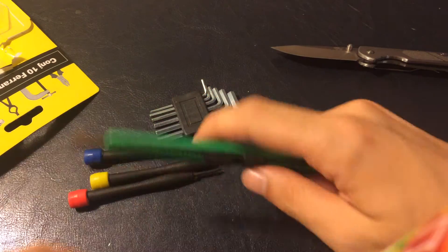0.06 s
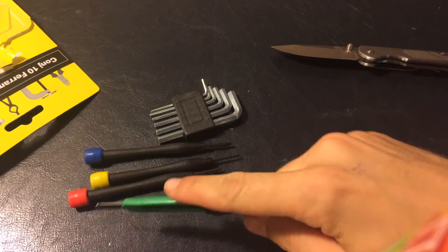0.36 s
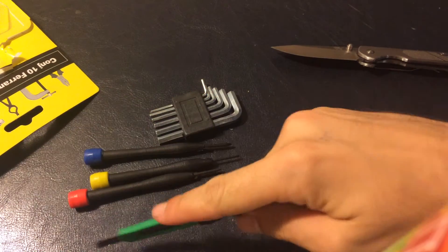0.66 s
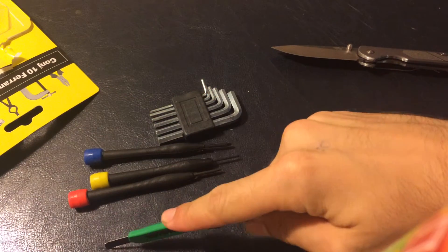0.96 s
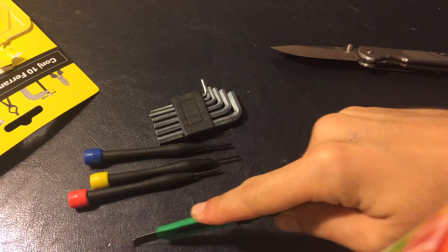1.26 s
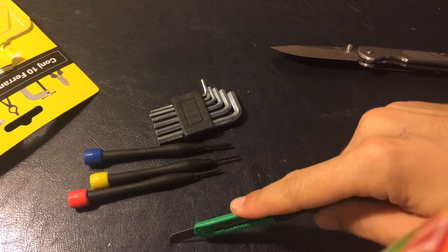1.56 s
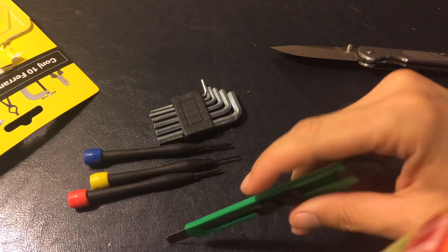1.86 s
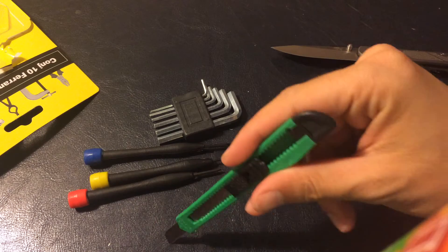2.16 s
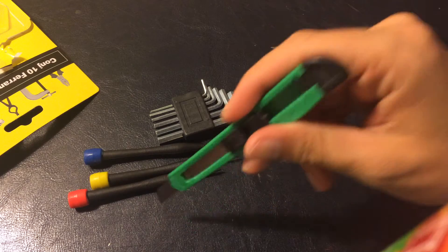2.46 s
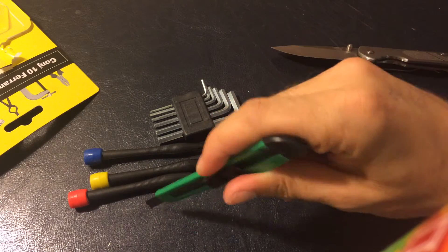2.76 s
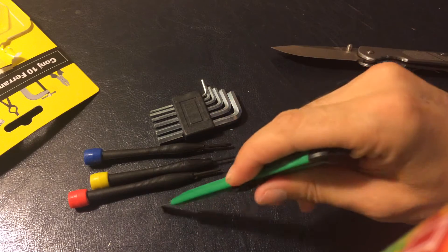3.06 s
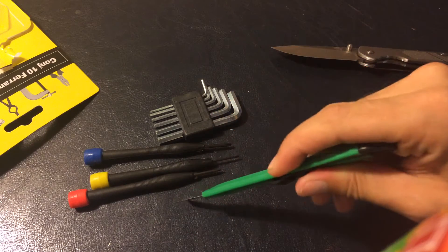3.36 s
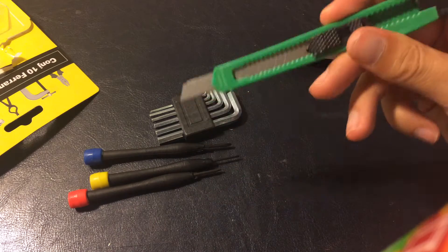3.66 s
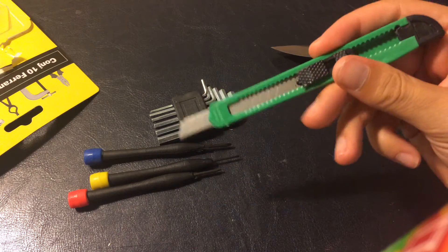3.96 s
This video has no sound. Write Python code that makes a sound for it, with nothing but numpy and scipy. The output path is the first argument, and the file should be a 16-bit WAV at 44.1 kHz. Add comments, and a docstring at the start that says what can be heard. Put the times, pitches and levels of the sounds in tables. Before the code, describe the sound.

A plastic utility knife clicks and rattles in the hand, then its blade scrapes lightly along a table. More clicks follow, the tip snaps hard against the surface and scrapes again, ending with a click, close up in a quiet room.

```python
"""A plastic utility knife clicks as its slider and loose blade knock inside the handle.
Its tip is dragged twice across a table, scraping in many tiny slips, and once snaps hard against it.
The hand holding the knife rustles, rubs and bumps softly.
The small, quiet room adds a short echo, with a faint hum and hiss underneath."""
import sys
import numpy as np
from scipy import signal
from scipy.fft import rfft, irfft
from scipy.io import wavfile
from scipy.ndimage import uniform_filter1d

SR = 44100
rng = np.random.default_rng(int(sys.argv[2]) if len(sys.argv) > 2 else 0)


def generate_wav(sig):
    """Save sig (samples, or channels by samples) to the path in sys.argv[1] as 16-bit PCM at SR."""
    pcm = np.round(np.clip(np.atleast_2d(sig).T, -1, 1) * 32767).astype(np.int16)
    wavfile.write(sys.argv[1], SR, pcm)


N = 176400  # 4 seconds

# The tone all clicks share: f/Hz, level/dB
CLICK_TONE = [(40, -24), (450, -13), (600, -9.5), (850, 0.5), (2250, -2), (2900, -9.5), (3300, 0.5),
              (4100, -3), (5300, -1), (8400, -1), (9400, 0), (10300, -3.5), (15000, -10)]
# Centres of the knock, middle, treble and top ranges: f/Hz
RANGE_CENTRES = [700, 1900, 5500, 11500]
# One click a row; knock, middle and top are boosts or cuts compared with the treble:
# t/s, level/dB, chatter/s, knock/dB, middle/dB, top/dB, handle ring f/Hz, blade ring f/Hz
CLICKS = [(0.157, -19.5, 0.0015, -29, -26, -10, 1500, 6000),
          (0.4506, -5.5, 0.0022, -3, 1, -20.5, 1520, 6070), (0.4523, -7, 0.0031, -2.5, 6, -13, 2000, 3340),
          (0.7793, -10, 0.002, -2.5, 0.5, -12, 1570, 5560),
          (0.7812, -1.5, 0.0032, -1, -1, -10.5, 1600, 6880),
          (2.1153, -6, 0.0019, -15.5, -8, -14.5, 1590, 7440), (2.2222, -28, 0.0021, 5.5, 4, -5, 1590, 7000),
          (2.365, -9.5, 0.0028, 1.5, -11, -0.5, 1540, 6340),
          (2.377, -8.5, 0.0022, -11, -10, -18, 1380, 4930),
          (2.3811, -11.5, 0.0021, -18, -14.5, 0, 1570, 6360),
          (2.4227, -22.5, 0.0049, -12, -4.5, -6.5, 1880, 4600),
          (2.6996, -17.5, 0.0015, 6, 3.5, -7.5, 860, 5200), (2.7024, -7.5, 0.002, 1.5, -7, -3, 1184, 6800),
          (3.538, -14.5, 0.003, -0.5, -3, -5, 1370, 6030), (3.5443, -2, 0.0048, -10, -11, -9.5, 1355, 7900)]
HANDLE_Q, HANDLE_DB, BLADE_Q, BLADE_DB = 4, 6, 8, 9  # each ring's sharpness (Q) and boost

def knife_clicks():
    """Slider and blade knock in the handle; the grip shifts the two pitches at which the knife rings."""
    out, (_, hz) = np.zeros(N), contact_axes()
    for start, db, chatter_s, knock_db, middle_db, top_db, handle_hz, blade_hz in CLICKS:
        colour = list(zip(RANGE_CENTRES, [knock_db, middle_db, 0, top_db]))
        body_db = value_at(CLICK_TONE, hz) + value_at(colour, hz)
        for ring_hz, q, ring_db in (handle_hz, HANDLE_Q, HANDLE_DB), (blade_hz, BLADE_Q, BLADE_DB):
            body_db += ring_db / (1 + (2 * q * (hz / ring_hz - 1)) ** 2)
        add(out, start, contact(chatter_s, db + body_db))
    return out


# The tone of the snapping tip: f/Hz, level/dB
SNAP_TONE = [(620, -25), (1400, -7), (1750, -17), (2350, -5.5), (2750, -17.5), (4000, -12.5), (5400, 4.5),
             (6150, -1.5), (6750, 7), (7500, -0.5), (8900, 2.5), (9550, -6.5), (10500, 2), (13000, -3.5)]

def tip_snap(start_s=2.9262, boost_db=11, chatter_s=0.0016):
    """The tip snaps against the table and the thin blade rings briefly."""
    out, (_, hz) = np.zeros(N), contact_axes()
    add(out, start_s, contact(chatter_s, boost_db + value_at(SNAP_TONE, hz)))
    return out


# How hard the blade presses, first laid flat, then on its edge: t/s, level/dB
FLAT_PRESSURE = [(0.92, -64), (0.97, -68.5), (0.99, -56), (1.18, -52), (1.22, -49.5), (1.39, -47.5),
                 (1.425, -43.5), (1.51, -43), (1.558, -49), (1.6, -84)]
EDGE_PRESSURE = [(2.89, -77.5), (2.93, -60), (3.08, -65), (3.115, -59), (3.2, -60.5), (3.28, -57.5),
                 (3.39, -56.5), (3.425, -54), (3.47, -84)]
# The tone of the blade laid flat and on its edge: f/Hz, level/dB
FLAT_TONE = [(50, -30.5), (135, -8), (270, -20.5), (620, -22.5), (1000, -8), (1380, 0.5), (1850, -5.5),
             (2450, -9), (3050, -16.5), (3450, -8.5), (5850, -6), (6500, 3.5), (7350, -7), (7800, -3.5),
             (8700, -12.5), (10300, -13), (13500, -18)]
EDGE_TONE = [(700, -13), (1100, -4.5), (1400, 1.5), (1750, -2), (2300, -16), (3000, -15.5), (3750, -5.5),
             (4950, -11.5), (5450, 1.5), (5950, 1), (6600, -9.5), (7450, -1), (8700, -14), (11000, -12.5),
             (13500, -20.5)]

def tip_scrape(pressure, tone, bright_hz=8700, handle_hz=1370):
    """The tip scrapes the table; pressing harder makes it brighter and rings the handle more."""
    db, scrape = level_curve(pressure), friction(tone)
    top = signal.sosfiltfilt(signal.butter(4, bright_hz, "high", fs=SR, output="sos"), scrape)
    bright = top + resonance(scrape, handle_hz, HANDLE_Q)
    boost_db = 3 + 0.48 * (db - db.max())
    return gain(db) * (scrape - bright + bright * gain(boost_db))


# Small ticks: t/s, level/dB
TICKS = [(0.9262, -25.5), (0.953, -25.5), (1.024, -21.5), (1.671, -26), (1.735, -23.5), (2.36, -23),
         (2.6658, -27.5), (2.731, -27.5), (3.3863, -22), (3.394, -16.5), (3.4196, -18), (3.4404, -14.5),
         (3.526, -22.5)]

def light_ticks(chatter_s=0.0022):
    """The tip catches and the grip shifts, ticking in the blade's scraping tone."""
    out, (_, hz) = np.zeros(N), contact_axes()
    blade_db = (value_at(FLAT_TONE, hz) + value_at(EDGE_TONE, hz)) / 2
    for start, db in TICKS:
        add(out, start, contact(chatter_s, db + blade_db))
    return out


# How loud the fingers rustle and the hand rubs: t/s, level/dB
RUSTLE_LEVEL = [(0, -58.5), (0.09, -62), (0.15, -67), (0.23, -74), (0.42, -73.5), (1.64, -89),
                (1.74, -63.5), (1.8, -91)]
RUB_LEVEL = [(0, -50.5), (0.15, -75), (0.45, -99.5)]
# The tones of the light rustle and the low rub: f/Hz, level/dB
RUSTLE_TONE = [(100, 7), (500, 3), (1500, 8.5), (2800, 1), (6000, 0.5), (15000, -10)]
RUB_TONE = [(25, -1), (130, 9.5), (290, -2.5), (460, -1), (680, -11), (1500, -40)]

def hand_rustle():
    """Skin rustles and rubs on the plastic."""
    rustle = gain(level_curve(RUSTLE_LEVEL)) * friction(RUSTLE_TONE, slips_per_s=6000, flutter_db=1.6)
    rub = gain(level_curve(RUB_LEVEL)) * friction(RUB_TONE, slips_per_s=3500, flutter_db=4.5)
    return rustle + rub


# Short rubs, and a click's hissy tail at 0.481 s: middle t/s, half length/s, level/dB, ring f/Hz
RUBS_AND_TAIL = [(0.037, .005, -56.5, 3470), (0.055, 0.0075, -56.5, 1640), (0.158, .028, -63.5, 12100),
                 (0.481, 0.03, -57, 5650), (1.924, 0.15, -76.5, 7640), (3.861, 0.041, -66, 784),
                 (3.927, 0.058, -75, 4140)]

def rubs_and_click_tail():
    """Short rubs, plus a bright hissy tail after the first loud click; each rings around one pitch."""
    out, t = np.zeros(N), np.arange(N) / SR
    for middle_s, half_s, db, hz in RUBS_AND_TAIL:
        swell = gain(db) * np.exp(-((t - middle_s) / half_s) ** 2)
        out += swell * normalise(resonance(friction(RUSTLE_TONE), hz, q=2.8))
    return out


# Soft bumps: t/s, level/dB, f/Hz
BUMPS = [(0.017, -51, 99), (0.452, -54, 149), (2.367, -53, 119), (2.705, -55, 160), (3.820, -52.5, 124.5),
         (3.881, -56, 129)]

def hand_bumps(rise_s=0.007, roughness=0.47):
    """The soft hand makes dull thuds that die away at once."""
    out, (t, _) = np.zeros(N), contact_axes()
    swell = t / rise_s * np.exp(1 - t / rise_s)
    for start, db, hz in BUMPS:
        near_pitch = signal.butter(2, [hz / 2, 2 * hz], "band", fs=SR, output="sos")
        noise = normalise(signal.sosfilt(near_pitch, rng.standard_normal(len(t))))
        add(out, start, gain(db) * swell * (np.sin(2 * np.pi * hz * t) + roughness * noise))
    return out


# How long the echo takes to fade by 60 dB: f/Hz, t/s
ECHO_FADE = [(1500, 0.34), (6000, 0.39), (14000, 0.19)]
# The tone of the echo: f/Hz, level/dB
ECHO_TONE = [(1500, 1.5), (6000, -4), (10000, -3.5), (15000, -8)]

def room_echo(sound, early_fade_s=0.0039):
    """Sound bounces off the table, hand and nearby tools, then dies away in the room."""
    hz, t, spectrum = signal.stft(rng.standard_normal(SR // 2), SR, nperseg=256)
    fade = gain(-60 * t / value_at(ECHO_FADE, hz)[:, None])
    tail = signal.istft(spectrum * fade, SR, nperseg=256)[1]
    early = rng.standard_normal(SR // 20) * np.exp(-np.arange(SR // 20) / SR / early_fade_s)
    echo = np.zeros(SR)
    add(echo, 0.006, gain(-16) * apply_tone(tail / np.linalg.norm(tail), ECHO_TONE))
    add(echo, 0.001, gain(-8.5) * early / np.linalg.norm(early))
    return sound + signal.fftconvolve(sound, echo)[:N]


# The two notes of the hum: f/Hz, level/dB
HUM_NOTES = [(57, -79.5), (124, -76)]
# The tone of the hiss: f/Hz, level/dB
HISS_TONE = [(18, -33), (30, -7), (114, -1), (148, -6), (747, -15), (7000, -25), (15500, -26)]

def hum_and_hiss(waver=0.46, hiss_db=-71.5):
    """A low hum wavers in pitch and loudness over the room's steady hiss."""
    hum, t = np.zeros(N), np.arange(N) / SR
    for hz, db in HUM_NOTES:
        note = np.sin(2 * np.pi * hz * t + waver * wander(8.8))
        hum += gain(db) * normalise(note * (1 + waver * wander(7.8)))
    return hum + gain(hiss_db) * normalise(apply_tone(rng.standard_normal(N), HISS_TONE))


def contact(chatter_s, body_db, ring_db=-18.5, ring_s=0.0063):
    """One hit and a quick chatter of smaller ones ring an object whose tone is body_db."""
    t, _ = contact_axes()
    fade = np.exp(-(t / chatter_s) ** 2) + gain(ring_db) * np.exp(-t / ring_s)
    chatter = rng.standard_normal(len(t)) * fade
    chatter[0] += 1.7  # the first hit
    spectrum = np.fft.fft(chatter)
    power = uniform_filter1d(abs(spectrum) ** 2, size=55, mode="wrap")
    log_gain = np.log(gain(body_db) / np.sqrt(power + 1e-12))
    body = np.exp(np.conj(signal.hilbert(log_gain)))  # puts the ringing after the hit
    return np.fft.ifft(spectrum * body).real


def friction(tone, slips_per_s=12000, flutter_db=1.5):
    """Rubbing is many tiny slips of uneven size, bunched by the grain of the surface."""
    slips = rng.standard_normal(N) * (rng.random(N) < slips_per_s / SR)
    slips *= gain(0.8 * np.minimum(rng.exponential(1, N), 4))
    return normalise(apply_tone(slips * gain(flutter_db * wander(70)), tone))


def contact_axes(size=4096):
    """The times and frequencies of one short hit."""
    return np.arange(size) / SR, abs(np.fft.fftfreq(size, 1 / SR))


def resonance(sound, hz, q):
    """Keeps the sound near one pitch; a higher q keeps a narrower range."""
    return signal.lfilter(*signal.iirpeak(hz, q, fs=SR), sound)


def apply_tone(sound, tone):
    """Turns each frequency up or down as a tone table says."""
    hz = np.fft.rfftfreq(len(sound), 1 / SR)
    return irfft(rfft(sound) * gain(value_at(tone, hz)), len(sound))


def wander(hz):
    """Random motion, mostly slower than hz."""
    spectrum = rfft(rng.standard_normal(N))
    return normalise(irfft(spectrum / (1 + (np.fft.rfftfreq(N, 1 / SR) / hz) ** 4), N))


def value_at(table, hz):
    """Looks up a frequency, gliding between the table's rows."""
    row_hz, values = np.transpose(table)
    return np.interp(np.log(hz + 1), np.log(row_hz + 1), values)


def level_curve(table):
    """Joins the rows into a curve in dB, silent before and after."""
    return np.interp(np.arange(N) / SR, *np.transpose(table), left=-140, right=-140)


def gain(db):
    """Turns decibels into a multiplier."""
    return 10 ** (np.asarray(db) / 20)


def normalise(sound):
    """Scales to an average strength (rms) of 1."""
    return sound / np.sqrt(np.mean(sound ** 2) + 1e-20)


def add(mix, start_s, sound):
    """Mixes a sound in at a time."""
    part = mix[max(round(start_s * SR), 0):][:len(sound)]
    part += sound[:len(part)]


def scene():
    """Knife and hand in the room, in one channel."""
    scrapes = tip_scrape(FLAT_PRESSURE, FLAT_TONE) + tip_scrape(EDGE_PRESSURE, EDGE_TONE)
    knife = knife_clicks() + light_ticks() + tip_snap() + scrapes
    soft_sounds = hand_bumps() + hand_rustle() + rubs_and_click_tail()
    return (room_echo(knife + soft_sounds) + hum_and_hiss())[None]


def record(dry):
    """Cuts the highest treble, above 15450 Hz."""
    low_pass = signal.firwin(301, 15450, window=("kaiser", 8), fs=SR)
    return signal.oaconvolve(dry, low_pass[None], "same")


dry = scene()
out = record(dry)
generate_wav(out)
```